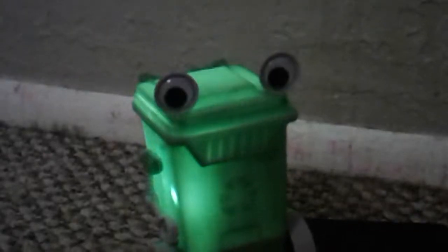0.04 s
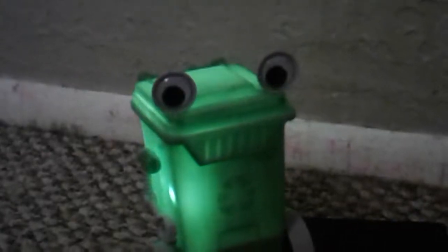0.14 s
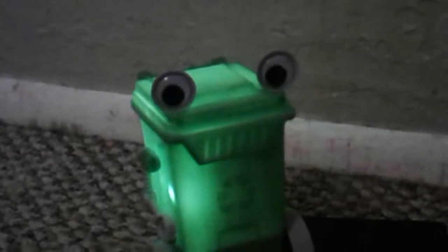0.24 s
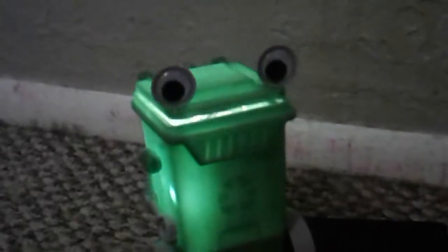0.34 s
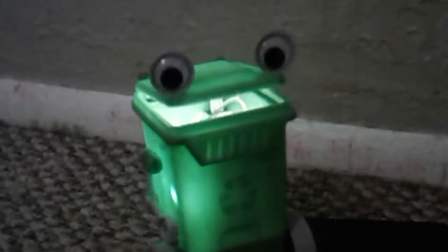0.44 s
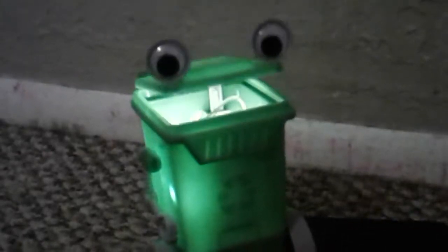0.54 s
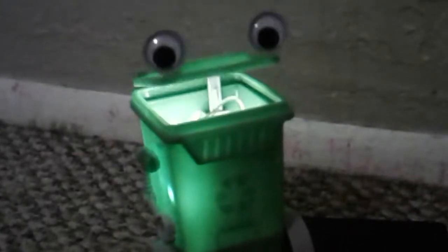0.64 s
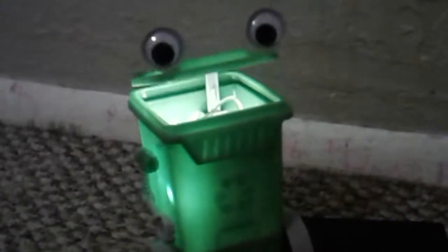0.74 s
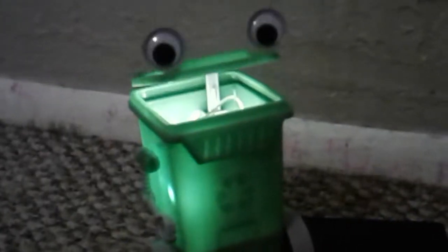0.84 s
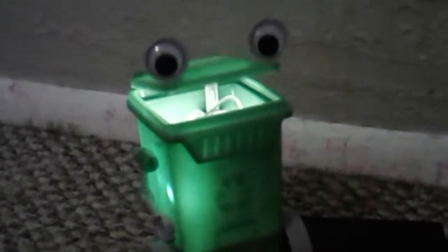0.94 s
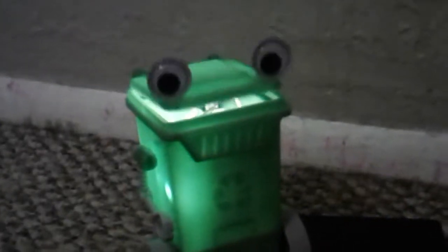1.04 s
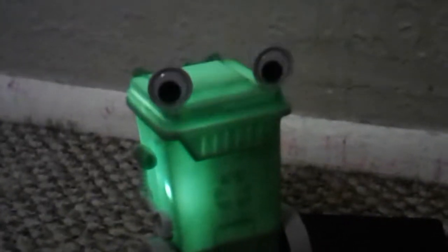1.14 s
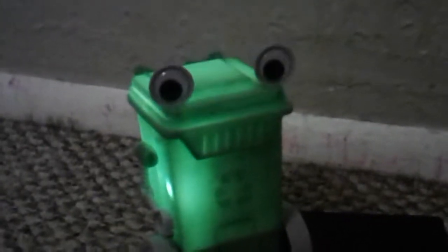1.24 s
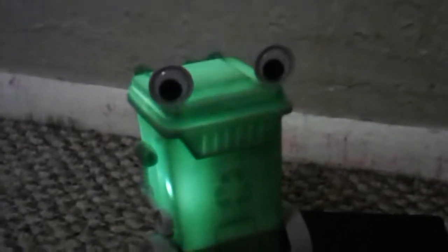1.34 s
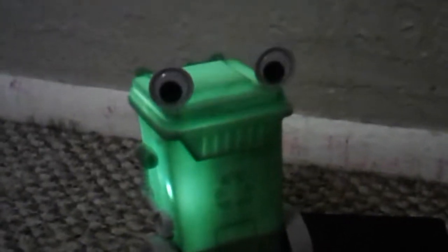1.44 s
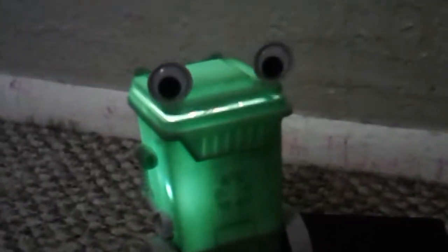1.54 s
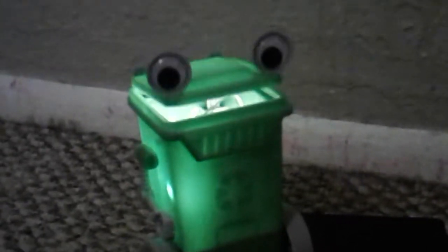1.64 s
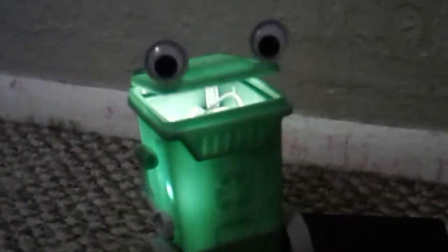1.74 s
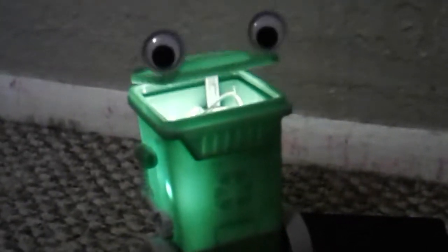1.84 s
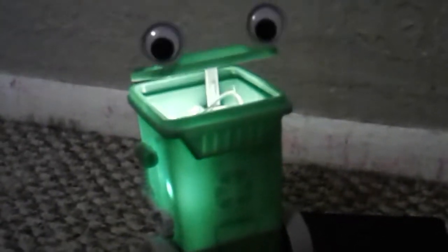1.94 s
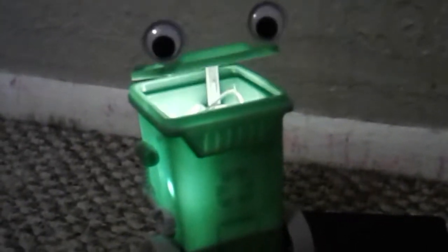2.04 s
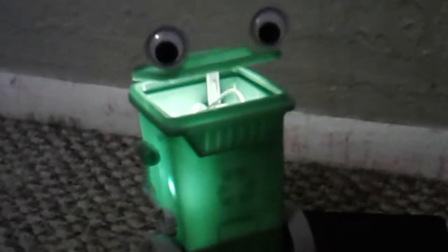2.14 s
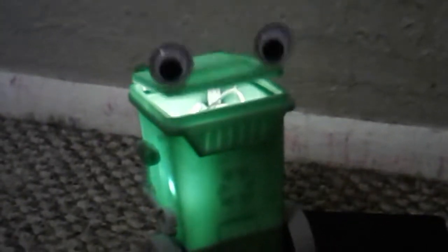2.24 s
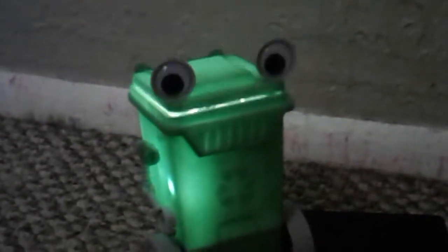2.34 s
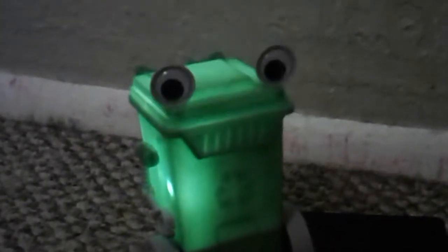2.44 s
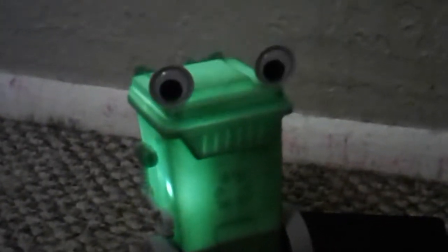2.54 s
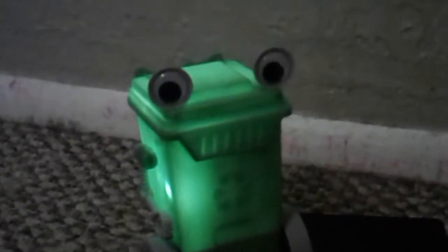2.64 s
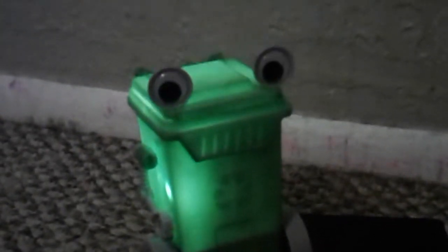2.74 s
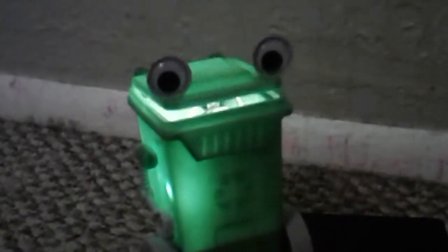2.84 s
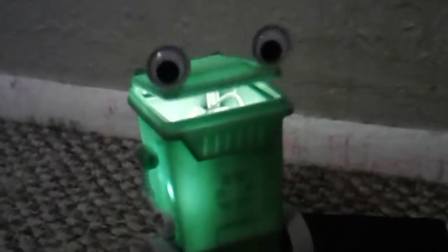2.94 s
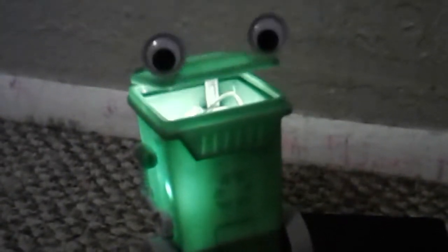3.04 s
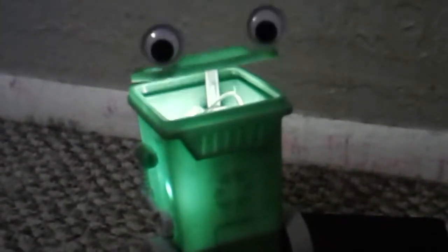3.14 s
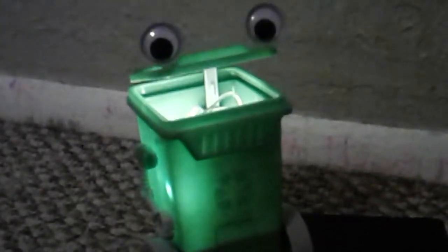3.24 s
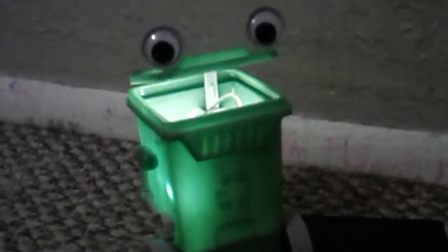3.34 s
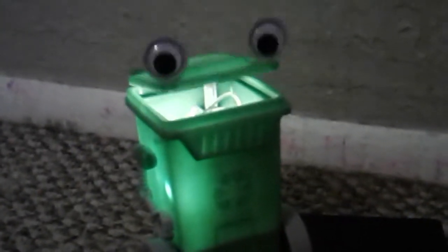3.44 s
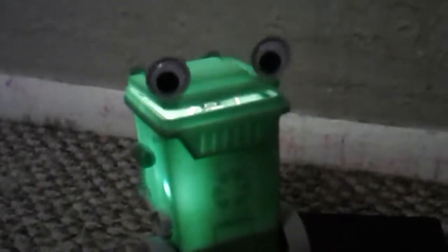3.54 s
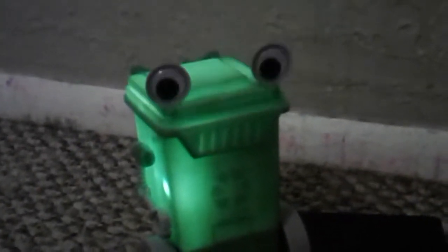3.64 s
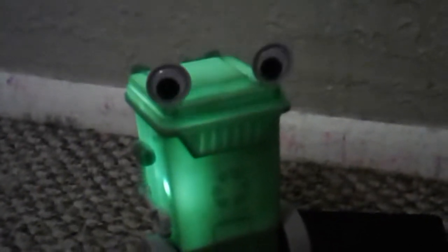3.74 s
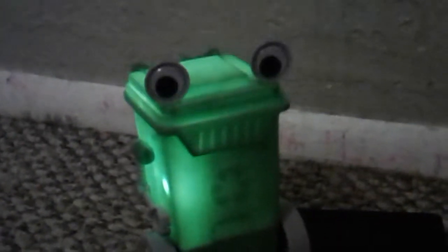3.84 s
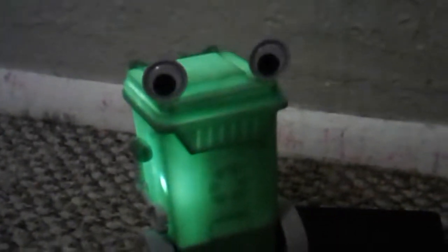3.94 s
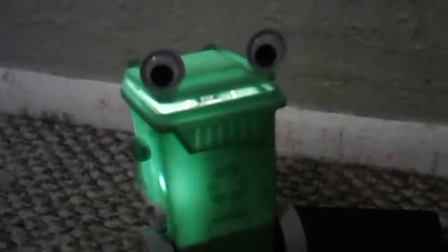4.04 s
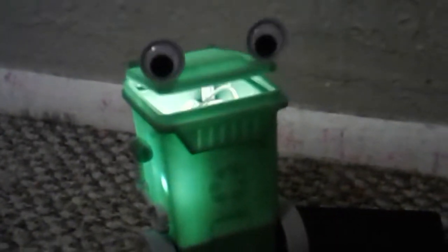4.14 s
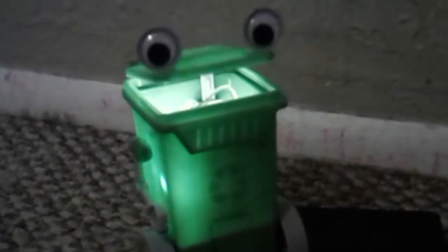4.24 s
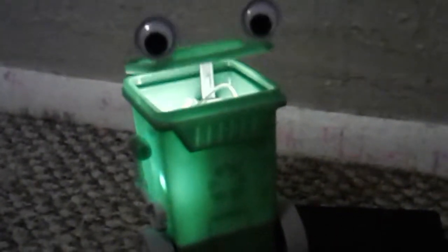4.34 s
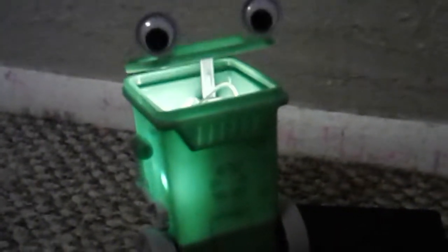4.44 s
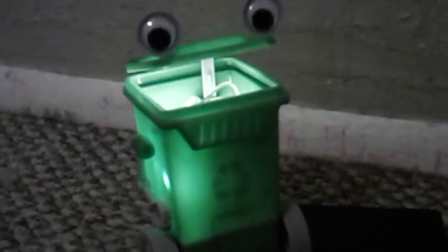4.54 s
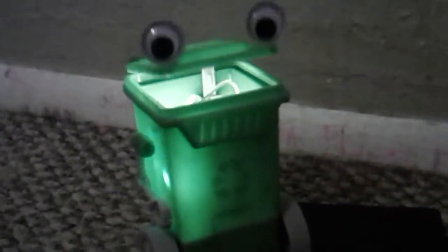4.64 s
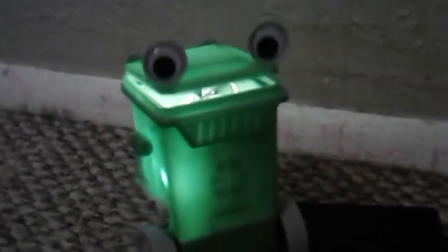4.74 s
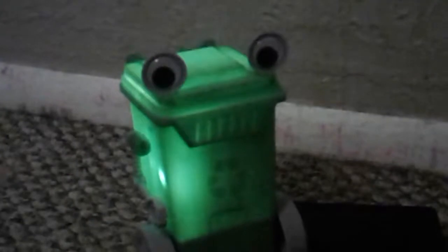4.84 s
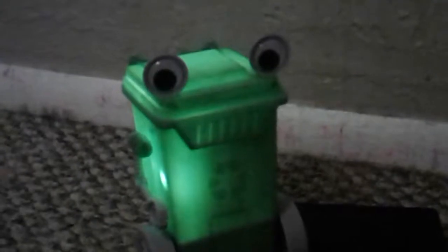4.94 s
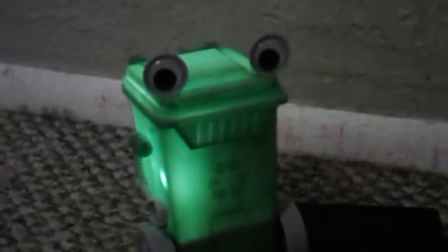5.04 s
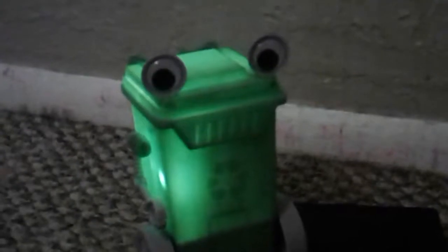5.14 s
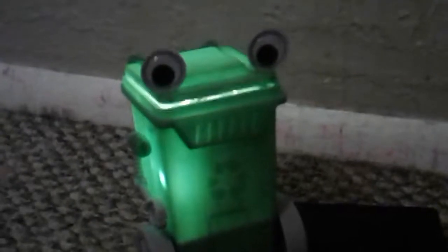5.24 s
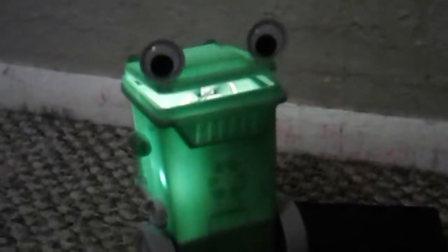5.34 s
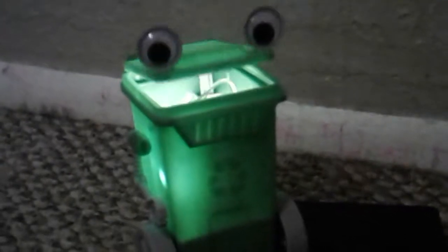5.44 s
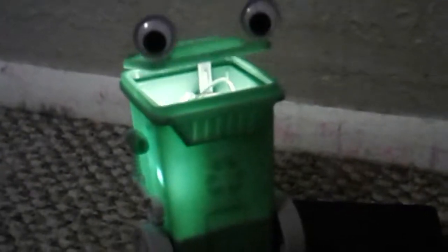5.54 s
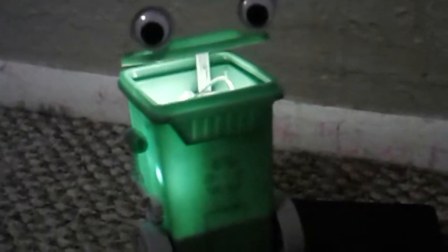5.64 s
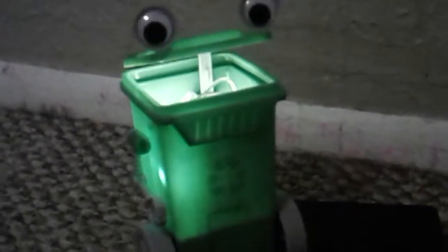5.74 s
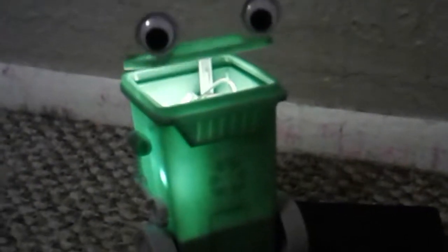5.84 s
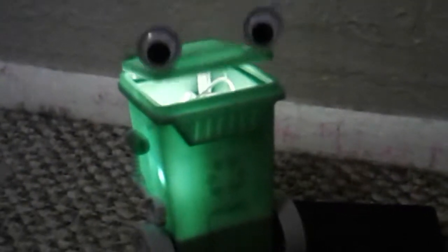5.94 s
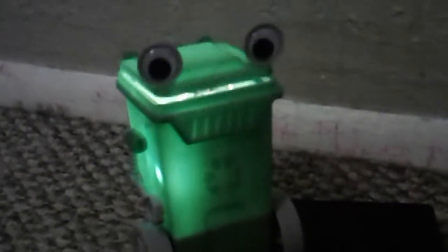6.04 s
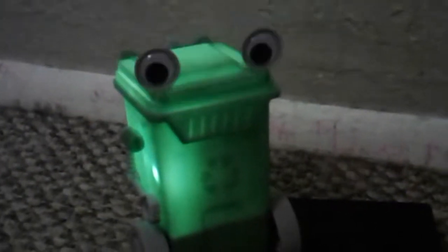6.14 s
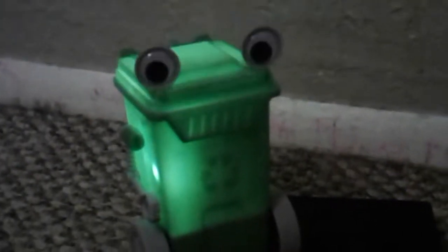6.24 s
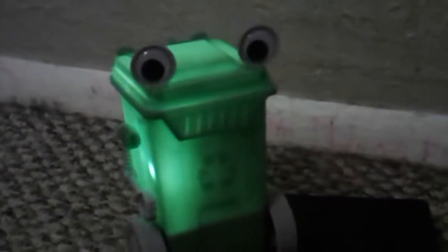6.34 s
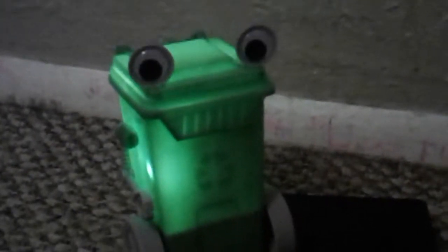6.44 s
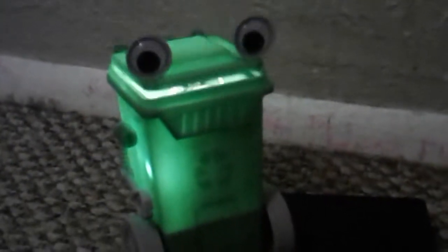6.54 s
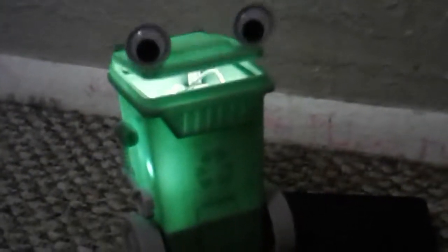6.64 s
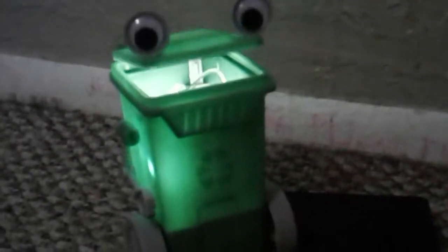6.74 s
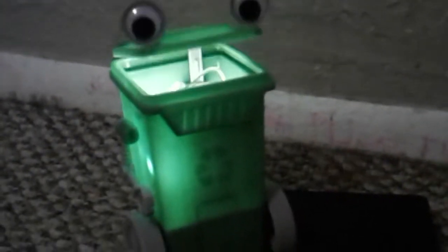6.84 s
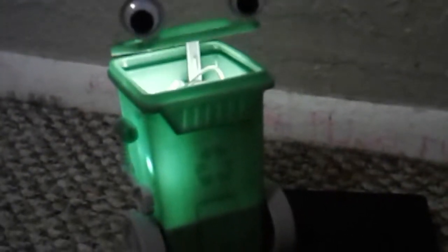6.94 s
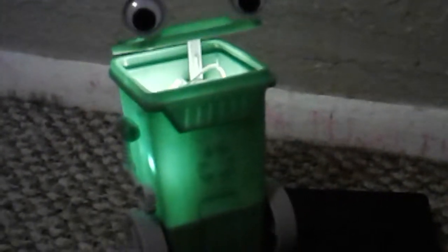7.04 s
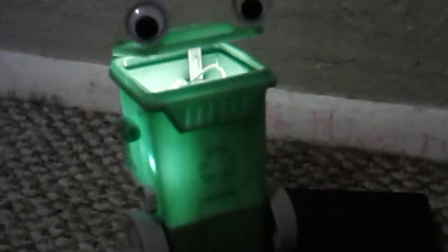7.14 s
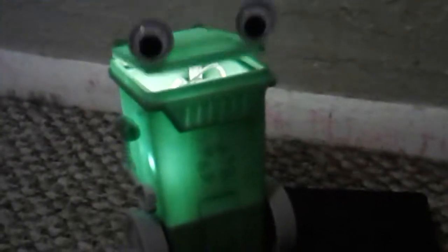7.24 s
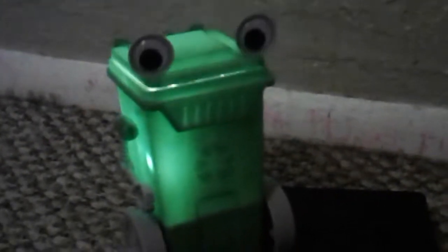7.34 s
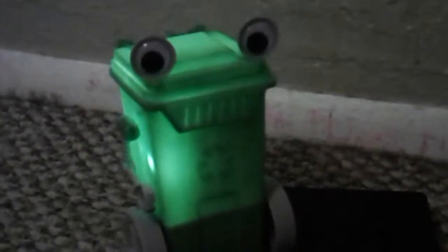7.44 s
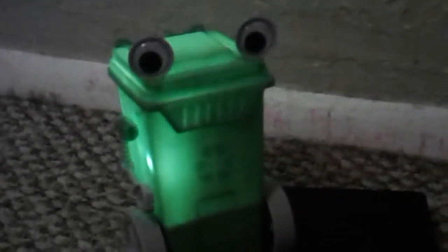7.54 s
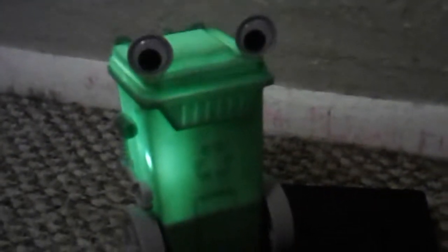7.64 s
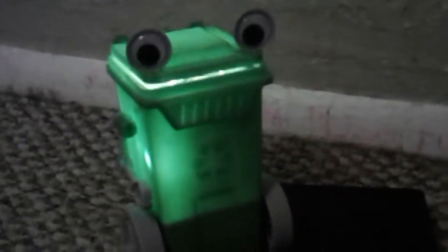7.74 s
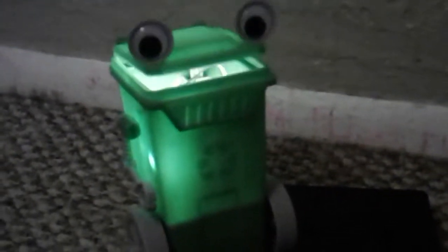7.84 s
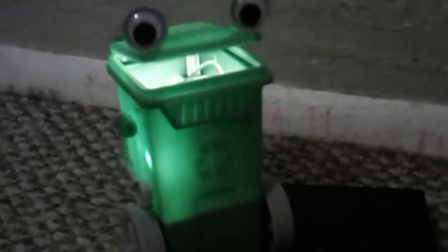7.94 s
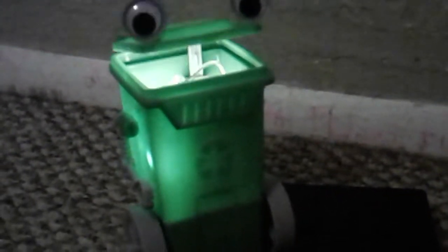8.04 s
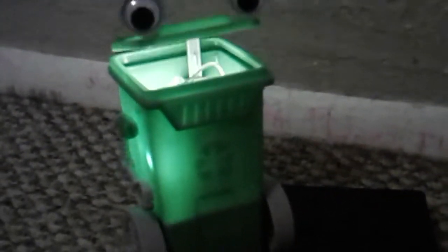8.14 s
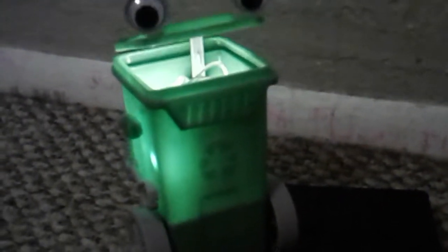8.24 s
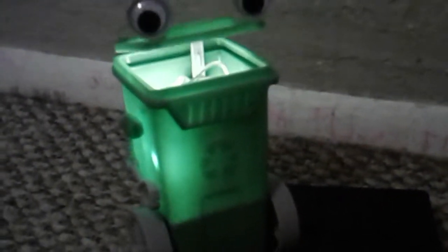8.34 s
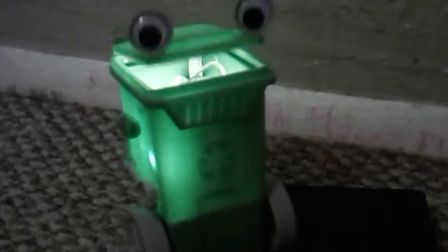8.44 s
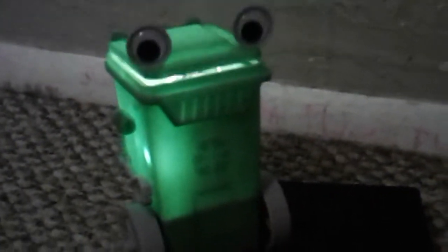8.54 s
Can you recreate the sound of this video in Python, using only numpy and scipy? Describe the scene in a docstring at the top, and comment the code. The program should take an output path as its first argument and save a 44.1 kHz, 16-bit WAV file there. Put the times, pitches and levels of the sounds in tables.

```python
"""A geared motor lifts and drops the plastic lid of a toy wheelie bin, close by in a small room.
It turns a crank about every 1.2 s: teeth knock at the same angles on every turn and ring the bin body.
Plastic parts rasp and scrape, rising and falling with the load, over a steady drone of shaped noise.
Once a turn the lid lands with a sharp clack: a few bounces, each a crack of noise and ringing plastic.
"""
import sys
import numpy as np
from scipy import signal
from scipy.fft import rfft, irfft
from scipy.io import wavfile
from scipy.ndimage import uniform_filter1d

SR = 44100
rng = np.random.default_rng(int(sys.argv[2]) if len(sys.argv) > 2 else 0)


def write(x):
    x = np.atleast_2d(x).T
    wavfile.write(sys.argv[1], SR, np.round(np.clip(x, -1, 1) * 32767).astype(np.int16))


N = 379260
TIME = np.arange(N) / SR


def undb(db):
    """Turn decibels into a gain."""
    return 10 ** (np.asarray(db) / 20)


def unit(x):
    """Scale a sound to an average (rms) level of 1."""
    return x / np.sqrt(np.mean(x ** 2))


def curve(table, at, axis=1):
    """Read a column of a table, with straight lines between its rows."""
    rows = np.array(table, float)
    return np.interp(at, rows[:, 0], rows[:, axis])


def ring(x, response):
    """Let every sample of a sound set off the given response."""
    return signal.fftconvolve(x, response)[:len(x)]


def colour(x, spectrum):
    """Filter a sound to a (frequency [Hz], level [dB]) shape, without sounding ahead of its input."""
    size = 8192
    hz, db = np.transpose(spectrum)
    bins_hz = np.fft.rfftfreq(4 * size, 1 / SR)
    shape_db = np.interp(np.log(bins_hz + 1), np.log(hz), db)
    # folding the cepstrum forward in time makes the filter minimum-phase
    cepstrum = irfft(np.log(undb(shape_db)))[:2 * size]
    cepstrum[1:] *= 2
    response = irfft(np.exp(rfft(cepstrum, 4 * size)))[:2 * size]
    return ring(x, response)


def split(x, hz):
    """Split a sound into the parts below and above a frequency."""
    low = signal.sosfiltfilt(signal.butter(8, hz, fs=SR, output="sos"), x)
    return low, x - low


def modes(table, scatter_db, spread_s, soft_hz):
    """Fading tones of a struck part; the spot struck sets the share, sign and arrival of each."""
    hz, width, db = np.transpose(table)[:, :, None]
    t = np.maximum(TIME[:SR // 5] - spread_s * rng.random(hz.shape), 0)
    sign = rng.choice([-1, 1], hz.shape)
    share = sign * undb(db + scatter_db * rng.standard_normal(hz.shape))
    # the root of the width makes each dB value stand for a tone's energy
    tones = np.sqrt(width) * np.exp(-np.pi * width * t) * np.sin(2 * np.pi * hz * t)
    response = np.sum(share * tones, axis=0)
    # plastic gives on contact, which leaves out the top
    soft = signal.cheby1(8, .5, soft_hz, fs=SR, output="sos")
    response = signal.sosfilt(soft, response)
    return response / np.linalg.norm(response)


def taps(times, sizes):
    """Place one-sample clicks at the given times [s]."""
    index = np.round(np.ravel(times) * SR).astype(int)
    inside = (index >= 0) & (index < N)
    return np.bincount(index[inside], np.ravel(sizes)[inside], N)


def walk(rate):
    """Random levels, each held for 1 / rate seconds, smoothed twice; spread near 1."""
    hold = int(SR / rate)
    steps = np.repeat(rng.standard_normal(N // hold + 1), hold)
    smooth = uniform_filter1d(uniform_filter1d(steps, hold), hold)
    return 1.3 * smooth[:N]


# crank position; the lid lands at every whole turn after the first row: (time [s], position [turns])
CRANK = [(.027, 0), (1.256, 1), (2.487, 2), (3.721, 3), (4.776, 3.85), (4.941, 4), (6.186, 5), (7.439, 6),
         (8.695, 7)]


def crank_angle():
    """Angle [degrees] of the turning crank at every moment."""
    return curve(CRANK, TIME) % 1 * 360


# the motor running up: (time [s], level [dB])
RUN_UP = [(.024, -20), (.032, -11), (.11, -7.5), (.18, -2), (.8, 2.5), (1.2, 2)]


def run_up():
    """Gain of the running sounds as the motor gets going."""
    return undb(curve(RUN_UP, TIME))


# colour of the motor's drone: (frequency [Hz], relative level per Hz [dB])
DRONE = [(28, -26), (48, -4.5), (75, 5), (99, -4.5), (122, 0.5), (155, -6.5), (215, 3), (265, 5),
         (340, -7.5), (440, -1.5), (550, -21), (950, 0.5), (1350, -16.5), (3000, -69)]


def motor(level_db=-49.0):
    """The shaking motor sets the whole bin droning, whatever the load."""
    return unit(colour(rng.standard_normal(N), DRONE)) * undb(level_db)


# where the strokes of a turn begin: idling under the shut lid, taking it up, lifting,
# easing over the top, lowering, letting go: (crank angle [degrees])
STROKE_STARTS = [0, 93, 108, 165, 237, 351]


def stroke_at(degrees):
    """Which stroke the crank is in, and how far through it (-.5 to .5)."""
    edges = np.append(STROKE_STARTS, 360)
    place = np.interp(degrees % 360, edges, np.arange(len(edges)))
    stroke, progress = np.divmod(place, 1)
    return stroke.astype(int), progress - .5


# load in each stroke, as relative levels:
# (gear rattle [dB], pinion rasp [dB], linkage scrape [dB], swell of rasp and scrape across it [dB])
STROKES = [(-41.5, -53, -53, -6), (-42, -51.5, -55.5, -2.5), (-49.5, -56, -57.5, 0.5),
           (-47.5, -59.5, -64.5, 3.5), (-40, -53.5, -51.5, 8.5), (-42.5, -56.5, -53, -2)]
STROKE_BLEND_S = 0.0077  # one stroke gives way to the next
TOOTH_RIPPLE_DB = 2  # each tooth of the slow wheel pushes the rubbing parts, up and down by this much


def pressure(degrees, axis, count=38):
    """Gain of a rubbing part: it swells or fades through each stroke and ripples with the slow teeth."""
    stroke, progress = stroke_at(degrees)
    rows = np.array(STROKES)[stroke]
    gain = undb(rows[:, axis] + rows[:, -1] * progress)
    gain = uniform_filter1d(gain, int(STROKE_BLEND_S * SR))
    return gain * undb(TOOTH_RIPPLE_DB * np.cos(count * np.radians(degrees)))


def friction(ticks_per_s=2000):
    """Plastic sliding on plastic: dense tiny ticks over a hiss."""
    sizes = undb(2.5 * rng.standard_normal(N)) * rng.choice([-1, 1], N)
    ticks = (rng.random(N) < ticks_per_s / SR) * sizes
    return unit(ticks) + .5 * rng.standard_normal(N)


# how far the crank holds the lid up: (crank angle [degrees], opening [0-1])
LIFT = [(0, 0), (90, 0), (230, 1), (360, 0)]


def squeal(degrees, shut_hz=4550, open_hz=5750, width_hz=600):
    """A broad resonance of the sliding linkage, which climbs as the lid rises."""
    hz = shut_hz + (open_hz - shut_hz) * curve(LIFT, degrees)
    # slow noise times a tone makes a band of noise around the tone
    grain = signal.sosfilt(signal.butter(3, width_hz / 2, fs=SR, output="sos"), friction())
    return unit(grain * np.sin(2 * np.pi * np.cumsum(hz) / SR))


# colour of the rasp: (frequency [Hz], relative level per Hz [dB])
RASP = [(520, -23), (1400, -10), (2100, 5.5), (2800, -7.5), (3800, 2), (4400, -2.5), (5600, 3.5),
        (6250, -7.5), (6850, -5.5), (7200, -20.5), (7900, -28), (8500, -41), (9200, -28), (10300, -49.5)]
# small stiff parts of the gearbox: (frequency [Hz], width [Hz], relative energy [dB])
PARTS = [(3200, 520, 0.5), (3887, 89, 0.5), (4272, 110, 3.5), (4740, 35, -5.5), (4875, 100, -2),
         (5256, 59, 2), (6220, 57, -5.5), (6810, 74, -10.5)]


def pinion(degrees, ring_db=-2, rasp_db=-1, scrape_db=-3, squeal_db=-4, flutter_db=1.5):
    """The fast small gear rasps and rings the small parts; the top is the linkage scraping under the lid."""
    parts = ring(friction(), modes(PARTS, scatter_db=0, spread_s=.001, soft_hz=6800))
    rubbing = unit(colour(friction(), RASP)) + undb(ring_db) * unit(parts)
    low, high = split(rubbing, hz=4800)
    rasp = low * undb(rasp_db) * pressure(degrees, axis=1)
    scrape = high + undb(squeal_db) * squeal(degrees)
    scrape = scrape * undb(scrape_db) * pressure(degrees, axis=2)
    return (rasp + scrape) * undb(flutter_db * walk(35))


def teeth(count, play=1):
    """Angles [degrees] of a wheel's contacts, each late by up to `play` of a tooth, and their unevenness."""
    degrees = (np.arange(count) + play * rng.random(count)) * 360 / count
    return degrees, rng.standard_normal(count)


SLACK_SWELL_DB = 8.5  # the rattle grows by this much over the top, as the teeth come loose


def load(degrees):
    """Relative level [dB] of the teeth: steady within a stroke, but growing over the top."""
    stroke, progress = stroke_at(degrees)
    over_top = stroke == 3
    return np.array(STROKES)[stroke, 0] + SLACK_SWELL_DB * progress * over_top


def every_turn(degrees, db, jitter_s, scatter_db):
    """Impacts tied to crank angles, repeated a little differently on each turn."""
    s, turns = np.transpose(CRANK)
    position = np.arange(turns[-1])[:, None] + degrees / 360
    late, louder = rng.standard_normal((2,) + position.shape)
    times = np.interp(position, turns, s) + jitter_s * late
    return taps(times, undb(db + scatter_db * louder))


# gearbox and bin walls: (frequency [Hz], width [Hz], relative energy [dB])
BODY = [(428, 150, -13.5), (755, 38, -8.5), (829.4, 39, -7), (905, 53, -4.5), (965.7, 36, -2),
        (1007, 44, -6), (1162, 38, -9.5), (1526, 46, -8), (1610, 11, -8.5), (1701, 81, -5.5),
        (1844, 120, -7.5), (1970, 91, -13.5), (2295, 56, -17.5)]
# snags, where the gears catch hard on every turn: (crank angle [degrees], relative level [dB])
SNAGS = [(17, -36), (142.2, -41), (158.9, -42), (218.4, -38), (236.8, -38), (254.7, -35), (262.6, -36),
         (286.7, -36), (294.2, -33), (301.5, -33), (346.5, -35)]


def gears(level_db=22.0, knock_db=4.0, rattle_db=-5.5, uneven_db=1.24, count=8):
    """Hard knocks of slow teeth and many light ones of faster wheels ring the body from several spots."""
    backlash_degrees, backlash_db = 2, -6
    slow, worn = teeth(count=38, play=.5)
    snag, snag_db = np.transpose(SNAGS)
    # a snag holds up the teeth within 4 degrees of it, so they stay silent
    clear = np.min(np.abs(slow[:, None] - snag), axis=1) > 4
    slow_db = np.where(clear, load(slow) + knock_db + uneven_db * worn, -np.inf)
    degrees = np.append(slow, snag)
    db = np.append(slow_db, snag_db)
    out = 0
    for k in range(count):  # each spot gets its share of the knocks and its own light teeth
        knocks = every_turn(degrees[k::count], db[k::count], jitter_s=.0003, scatter_db=1)
        light, uneven = teeth(count=80)
        # just before a knock the teeth fly free across their backlash (the gap between teeth)
        ahead = degrees - light[:, None]
        free = np.any((ahead > 0) & (ahead < backlash_degrees), axis=1)
        light_db = load(light) + uneven_db * uneven + backlash_db * free
        rattle = every_turn(light, light_db, jitter_s=.0002, scatter_db=1.2)
        body = modes(BODY, scatter_db=1.2, spread_s=.0022, soft_hz=4500)
        out = out + ring(knocks + undb(rattle_db) * rattle, body)
    return undb(level_db) * out


# the lid's contacts as it settles: (time after landing [s], relative level [dB])
BOUNCES = [(0, -10), (.002, -0.5), (.007, -8.5), (.014, -6.5), (.025, -11), (.035, -11.5), (0.041, -34)]
# ringing tones of the lid: (frequency [Hz], width [Hz], relative energy [dB])
LID = [(258, 24, -12), (438, 21, -16.5), (772, 75, -4.5), (952, 51, 2), (1180, 60, -9.5), (1398, 20, -9),
       (1730, 290, -15), (1724, 43, 4.5), (2140, 92, -16), (2279, 51, 2), (2930, 43, -5.5),
       (3710, 140, -1.5), (4114, 70, -7), (5000, 160, -1)]
# colour of the lid's crack: (frequency [Hz], relative level per Hz [dB])
CRACK = [(200, -15.5), (480, 2), (1000, 5), (1700, 14.5), (2700, -2.5), (4300, 7), (5200, -9), (6300, -5),
         (7000, -17), (7500, -23), (8000, -20.5), (8500, -41), (9400, -37), (12000, -50)]
CLACK_DB = -32  # size of a landing, before the lid's own gain


def lid(crack_db=-1, level_db=29.0, start_db=-53):
    """The lid lands and bounces, cracking and ringing at each contact; it also jolts as the motor starts."""
    delay, bounce_db = np.transpose(BOUNCES)
    contacts = taps([.029], undb([start_db]))
    for landing, turns in CRANK[1:]:
        if turns % 1 == 0:
            contacts = contacts + taps(landing + delay, undb(CLACK_DB + bounce_db))
    tone = ring(contacts, modes(LID, scatter_db=0, spread_s=.002, soft_hz=6500))
    # each contact's energy drains away in a few milliseconds of noise
    drain = np.exp(-TIME[:SR // 5] / .003)
    envelope = np.sqrt(np.abs(ring(contacts ** 2, drain)))
    crack = colour(rng.standard_normal(N) * envelope, CRACK)
    return (tone + undb(crack_db) * unit(crack) * np.std(tone)) * undb(level_db)


def room(x, wet_db=-7):
    """The small carpeted room adds a short tail of fading noise, 60 dB down after t60_s."""
    t, t60_s = TIME[:SR // 2], .18
    fade = np.exp(-np.log(1000) * t / t60_s)
    tail = rng.standard_normal(len(t)) * fade * (t > .003)
    return x + undb(wet_db) * ring(x, tail / np.linalg.norm(tail))


def scene():
    """Motor, pinion and gears run up together; the lid clacks once a turn."""
    running = run_up()
    drone = motor() * running
    machinery = (pinion(crank_angle()) + gears()) * running
    return (room(machinery + lid()) + drone)[None]


# the treble starts dull and opens up: gain at first and in the end [dB], time constant [s]
TREBLE_START_DB, TREBLE_END_DB, TREBLE_OPEN_S = -19.5, 3.8, 2.72
TOP_HZ = 15700  # nothing much passes above this


def record(dry, shelf_hz=4650, hiss_db=-88, whine_db=-93):
    """A small camera: slowly brightening treble, faint hiss and a thin electronic whine."""
    low, high = split(dry, shelf_hz)
    still_dull = np.exp(-TIME / TREBLE_OPEN_S)
    treble_db = TREBLE_END_DB + (TREBLE_START_DB - TREBLE_END_DB) * still_dull
    sound = low + high * undb(treble_db)
    hiss = undb(hiss_db) * rng.standard_normal(N)
    whine = undb(whine_db) * unit(np.sin(2 * np.pi * 12662 * TIME))
    top_cut = signal.ellip(8, .2, 70, TOP_HZ, fs=SR, output="sos")
    return signal.sosfilt(top_cut, sound + hiss + whine)


dry = scene()
out = record(dry)
write(out)
```